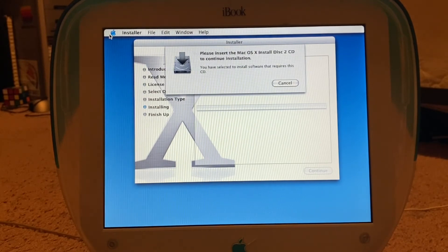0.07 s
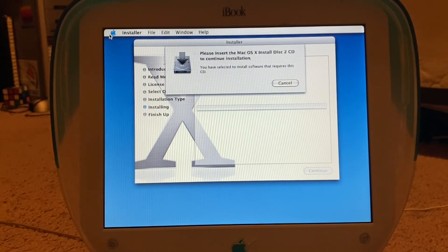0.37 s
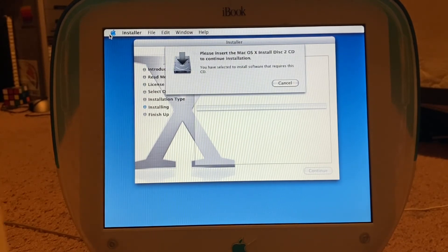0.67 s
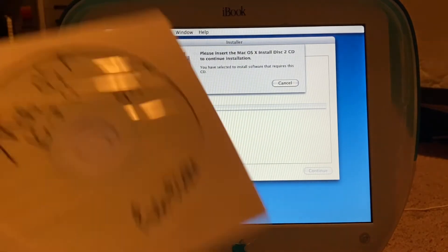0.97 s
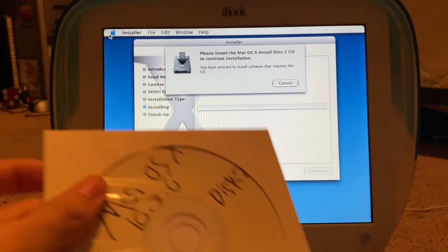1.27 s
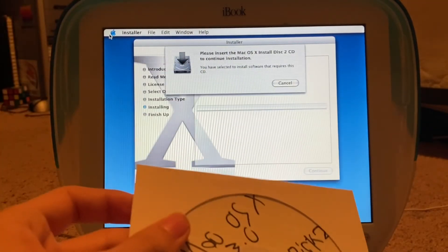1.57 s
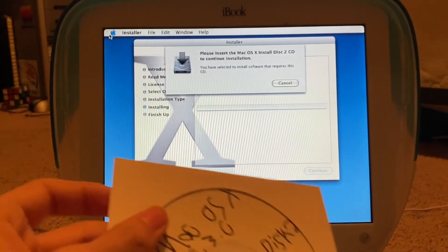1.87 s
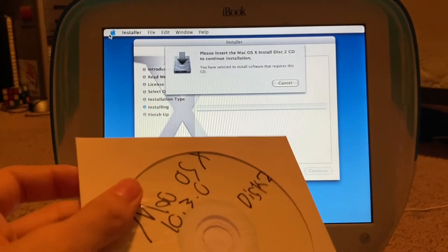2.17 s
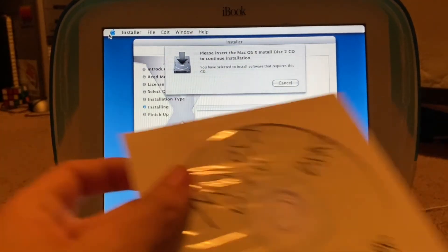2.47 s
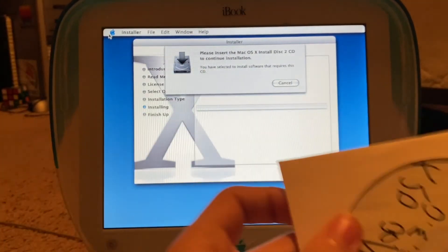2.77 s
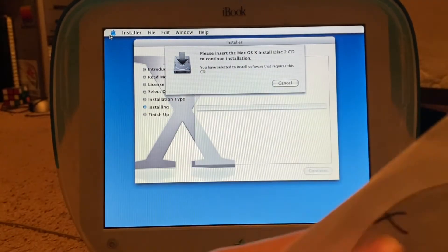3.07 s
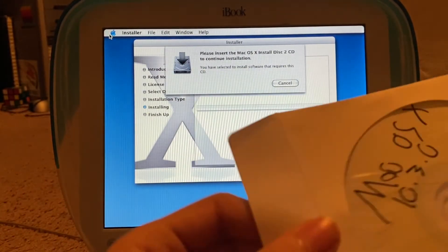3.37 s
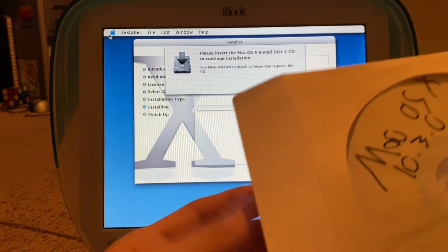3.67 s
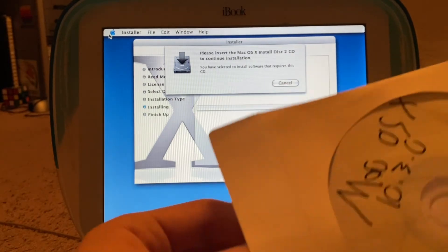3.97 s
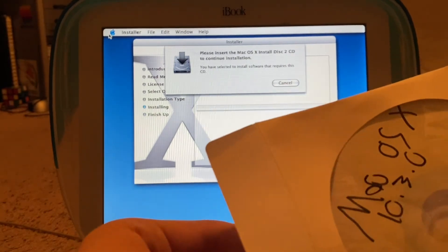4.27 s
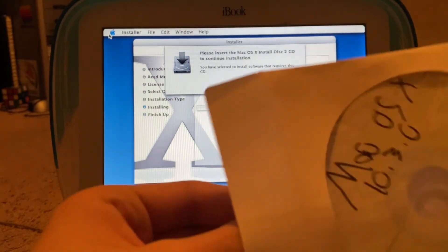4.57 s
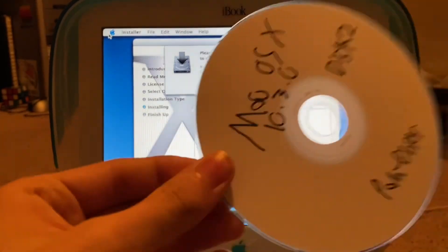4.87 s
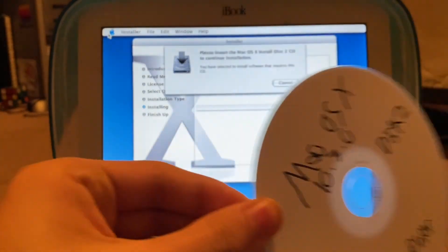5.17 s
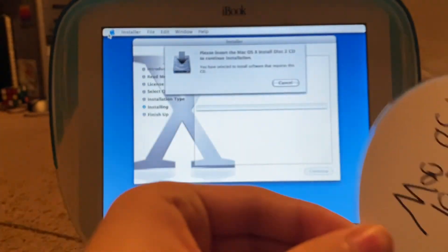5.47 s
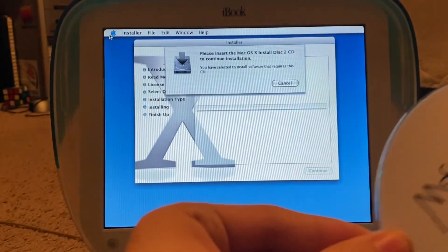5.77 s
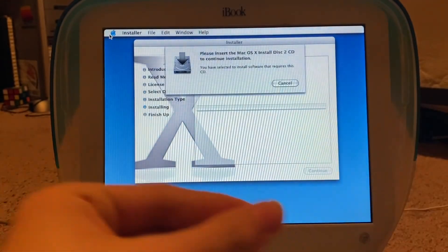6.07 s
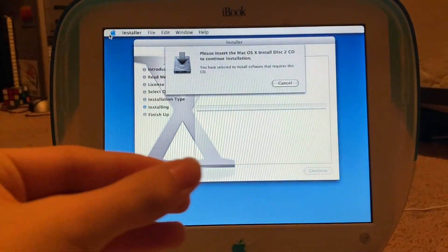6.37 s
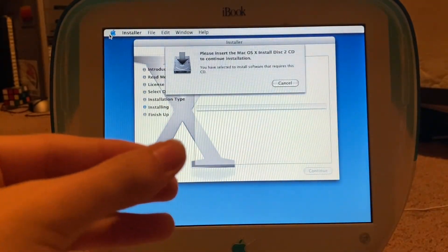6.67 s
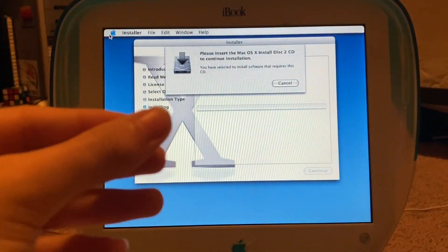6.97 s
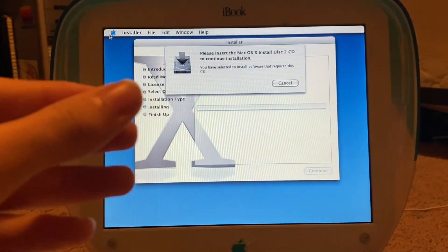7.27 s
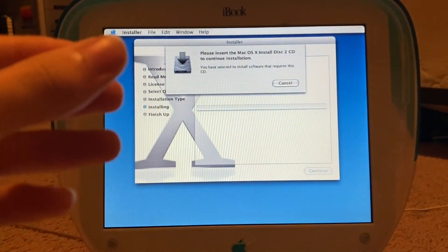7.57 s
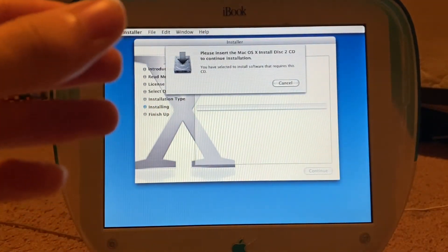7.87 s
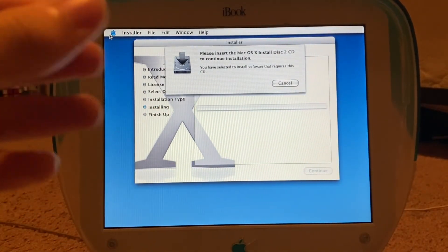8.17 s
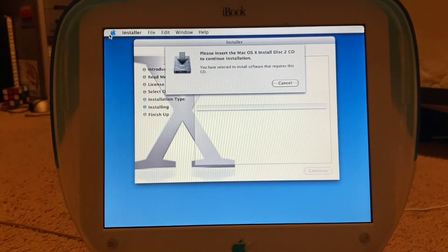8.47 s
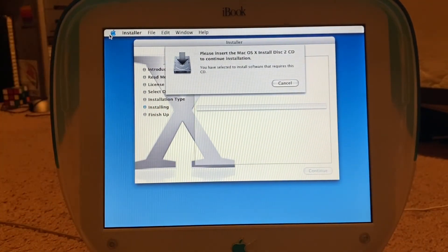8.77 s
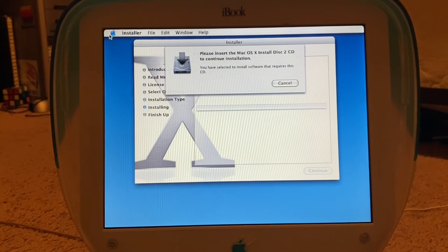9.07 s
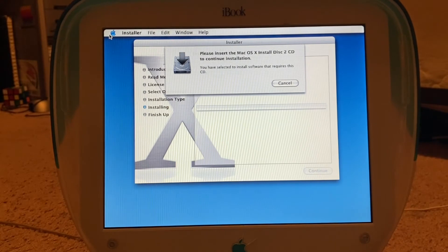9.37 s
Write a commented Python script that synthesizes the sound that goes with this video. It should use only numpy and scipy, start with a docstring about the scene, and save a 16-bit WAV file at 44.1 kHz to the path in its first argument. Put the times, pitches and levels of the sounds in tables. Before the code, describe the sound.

Close paper rustling, a sliding disc and sharp plastic clicks of a laptop tray being loaded and closed, with a steady electrical hum indoors.

```python
"""A low electrical hum fills a small carpeted room throughout. First a paper sleeve crackles close by,
its creases buckling, and a laptop's plastic tray pops open at 1.6 s. The sleeve rustles again until the
disc slides out with a frictional hiss near 4.7 s. The tray is handled and takes the disc on its hub at
6.5 s, each contact exciting the modes of the plastic. It is pushed shut, and from about 9 s the
drive's motor buzzes in harmonics of its step rate."""
import sys
import numpy as np
from scipy import signal
from scipy.fft import rfft, irfft, next_fast_len
from scipy.io import wavfile
from scipy.ndimage import uniform_filter1d, map_coordinates

SR = 44100
rng = np.random.default_rng(int(sys.argv[2]) if len(sys.argv) > 2 else 0)


def master_out(mix):
    """Clip the mix to full scale and print it as 16-bit PCM to the path in sys.argv[1]."""
    frames = np.transpose(np.atleast_2d(mix))
    ceiling = np.clip(frames, -1, 1)
    pcm = np.round(ceiling * 32767).astype(np.int16)
    wavfile.write(sys.argv[1], SR, pcm)


N = 424683
TIME = np.arange(N) / SR

# Levels are relative; brightness raises the treble and lowers the bass by the same amount.
# loudest creases of the sleeve snapping: t/s, level/dB, brightness/dB
CREASES = [(0.194, -70.5, 13.5), (0.354, -51.5, 4.5), (0.4825, -48.5, 8), (0.541, -52.5, 2),
           (0.5967, -69, 12), (0.7212, -66, 14.5), (0.6847, -72, 16), (0.8366, -69, 16), (0.927, -65.5, 4),
           (0.981, -67, 1), (2.49, -66, -1.5), (2.56, -71.5, -10), (2.7238, -41, -5), (2.7784, -54, 10),
           (2.962, -52.5, 10.5), (3.0107, -64.5, 20), (3.1911, -53.5, 13.5), (3.2139, -43, 0),
           (3.3059, -48, 9.5), (3.3567, -50.5, 4.5), (3.3926, -46.5, 4), (3.4047, -39.5, 4.5),
           (3.425, -42.5, 13), (3.4464, -35.5, 3.5), (3.4861, -35.5, -2), (3.583, -48, -3), (3.6, -38, 4.5),
           (3.662, -39, 10), (3.7899, -49.5, -7.5), (3.878, -51.5, 12), (3.9375, -48.5, 2),
           (3.988, -52.5, 10), (4.146, -53, 9.5), (4.178, -51.5, 8.5), (4.2884, -52, -3), (4.415, -45, 4.5)]
# spells of fine crackle as the sleeve bends: start/s, end/s, snap rate/Hz, level/dB
CRACKLE_SPELLS = [(0.34, 0.712, 8, -70), (3.1, 3.98, 20, -56)]
# fingers rubbing the sleeve: t of peak/s, level/dB, brightness/dB, rise/s, fall/s
RUSTLE_STROKES = [(0.4, -59, 9.5, 0.073, 0.21), (0.53, -57.5, -0.5, 0.24, 0.067),
                  (0.83, -66.5, 0, 0.17, 0.29), (1.33, -70, -6, 0.2, 0.18), (2.3, -69.5, -5.5, 0.26, 0.7),
                  (2.76, -64, 10.5, 0.075, 0.27), (2.97, -61, 4.5, .2, 0.22),
                  (3.073, -43.5, -6.5, 0.042, 0.037), (3.15, -50, 2, 0.1, 0.16),
                  (3.245, -37.5, -1.5, 0.022, 0.026), (3.33, -52, 0, 0.1, .05),
                  (3.422, -39, 0, 0.01, 0.033), (3.59, -48, 2.5, .16, 0.064),
                  (3.732, -42.5, 0, 0.084, 0.044), (3.858, -49, 1.5, .07, 0.091),
                  (4.09, -59, 1, 0.094, 0.24), (4.42, -63, 5.5, 0.13, 0.13),
                  (4.57, -44.5, -2.5, 0.02, 0.067), (4.664, -36, -0.5, 0.032, 0.033),
                  (4.806, -33, 0.5, 0.041, 0.014), (4.97, -70, 7, 0.34, .06)]
# treble of the disc sliding along the paper: t/s, level/dB
SLIDE_TREBLE = [(4.45, -64), (4.494, -69), (4.51, -52.5), (4.688, -38.5), (4.708, -29), (4.738, -28.5),
                (4.814, -51), (4.822, -70.5), (4.86, -62.5)]
# sleeve slipping through the fingers: t/s, centre f/Hz, level/dB
SWISH_GLIDE = [(2.5, 3230, -79), (2.68, 3100, -70), (2.78, 2970, -64.5), (2.869, 2794, -57.5),
               (2.951, 2340, -75), (3.039, 2230, -57)]
# spectrum of rubbed paper: f/Hz, level/dB
PAPER_SPECTRUM = [(300, 4.5), (520, -2), (800, -0.5), (1150, 2), (1700, 0.5), (2300, 3.5), (3500, 3),
                  (5000, -3), (7000, -5.5), (11500, -5), (15000, -7.5), (16500, -25.5)]
# knocks on tray and disc: t/s, level/dB, bass re level/dB, treble re level/dB, flexural f/Hz
KNOCKS = [(1.2481, -60.5, -1.5, -28, 784), (1.587, -41, 4, -17, 460), (1.6012, -25, -3, -2, 755),
          (1.6075, -26, -4, -16, 824), (1.727, -52.5, 5.5, -28, 544), (1.8466, -59.5, -3, -27, 850),
          (2.0509, -53, 6.5, -10, 816), (2.726, -57.5, 14.5, 4, 1000), (5.0901, -44, 14, -3, 850),
          (5.1642, -50.5, 10.5, 10, 436), (5.2789, -54.5, 5.5, 0, 1374), (5.7008, -68.5, -2, -4, 455),
          (6.34, -48.5, -1.5, -5.5, 838), (6.3671, -55.5, -1.5, -6, 850), (6.5349, -53, 9.5, -1.5, 1160),
          (6.5605, -34, -1, -5, 850), (6.5715, -44.5, 2.5, -11, 653), (6.597, -48, 4, -4, 865),
          (7.0542, -50.5, 12, -17, 890), (7.072, -52, 1, -5, 696), (7.084, -49, 5, -10, 580),
          (7.2005, -55.5, 4.5, -11, 1130), (7.3482, -77.5, 19.5, -20.5, 843), (7.466, -65.5, 2, -28, 582),
          (7.774, -69.5, 8.5, -18.5, 890), (7.857, -45, -7, 1, 495), (7.8665, -32.5, 9.5, 0, 500),
          (7.872, -27.5, 3, 0.5, 710), (7.886, -39.5, -7, -1, 592), (8.097, -67.5, -14, -2, 472),
          (8.5922, -30.5, -9.5, -4.5, 1110), (8.6044, -32.5, -7, -11, 1000), (8.7061, -29, -2.5, -3, 990),
          (8.8165, -50, -3.5, -4, 910), (8.8584, -36.5, -8, -2.5, 434), (8.8828, -38, -1, -3, 720),
          (8.9501, -56.5, 6, -18, 1710), (9.0256, -56, 5, -10.5, 525)]
# fingers on the tray, tray on its rails: t of peak/s, level/dB, brightness/dB, rise/s, fall/s
SCRAPE_STROKES = [(1.625, -39, -2, .015, 0.067), (1.764, -53, -15, .06, 0.084),
                  (1.927, -49.5, -7, .045, 0.086), (2.08, -63, -12.5, .05, 0.037),
                  (5.105, -46, -4, .012, 0.15), (5.179, -49, 9, .06, 0.021), (5.319, -54, -0.5, .08, 0.035),
                  (5.515, -65.5, -1.5, .03, 0.028), (5.79, -50.5, 0, .04, 0.034),
                  (5.86, -75.5, 4.5, .04, 0.14), (6.76, -71.5, -7, 0.12, 0.1),
                  (6.969, -77.5, -8.5, .1, 0.046), (7.084, -56, -8, 0.14, 0.1),
                  (7.48, -70, -10, .05, 0.093), (7.909, -49, -2.5, .02, 0.09),
                  (8.45, -55, -2.5, 0.067, 0.17), (8.579, -46.5, -2, .09, 0.28),
                  (8.66, -50.5, -4, .08, 0.11), (8.9, -55, -9.5, .07, 0.083),
                  (9.05, -65.5, -11, .06, 0.085)]
# disc skidding over the hub: t of peak/s, level/dB, brightness/dB, rise/s, fall/s
SKID_STROKES = [(6.38, -61.5, -8, 0.016, 0.15), (6.52, -45, 1, 0.084, .04),
                (6.548, -43.5, -12, .015, 0.065), (6.61, -48.5, -13, 0.047, 0.042)]
# disc brushing round as it starts to spin: t/s, level/dB
SPIN_LEVEL = [(9.26, -100), (9.32, -61), (9.45, -69), (9.63, -82)]
# modes of the tray: f/Hz, bandwidth/Hz, gain/dB
TRAY_MODES = [(325, 60, -4.5), (505, 21, -1.5), (846, 50, -1), (1110, 15, -11), (1807, 55, 6),
              (2230, 60, -2), (2850, 460, 2.5), (3070, 64, -6), (3420, 80, 3), (3690, 70, 6),
              (4120, 450, -6), (4650, 54, 0), (5360, 44, -14), (6980, 210, -8.5), (7300, 80, -5)]
# modes of the bare disc: f/Hz, bandwidth/Hz, gain/dB
DISC_MODES = [(830, 55, -9), (1260, 41, -9), (1750, 130, -14), (2800, 120, -2.5), (3110, 70, -0.5),
              (3420, 56, -11.5), (3760, 120, 1), (4400, 43, -5.5), (4940, 69, -10.5), (5480, 49, -11),
              (6500, 75, -10.5), (7000, 43, -13.5)]
# soft bumps of the hand: t/s, level/dB, f/Hz, duration/s
BUMPS = [(2.39, -37, 78.7, .1), (2.41, -38, 117, 0.06), (2.724, -26.5, 74, 0.03), (3.85, -39, 50.7, 0.081),
         (5.088, -36, 175, 0.048), (5.15, -42, 185, 0.058), (7.864, -33.5, 216, 0.02),
         (7.87, -35.5, 84.7, 0.048)]
# strongest harmonics of the motor's step rate: harmonic number, level/dB
MOTOR_HARMONICS = [(5, -79), (6, -78), (9, -81), (11, -75.5), (13, -81), (15, -82), (17, -73.5), (18, -76),
                   (19, -80), (23, -82), (24, -85)]
# envelope of the drive's whirr: t/s, level/dB
WHIRR_LEVEL = [(0, -82), (1.2, -72.5), (2.4, -76.5), (4.3, -82), (5.5, -98.5), (6.3, -115), (7.0, -81.5),
               (8.3, -87), (8.85, -82), (9.0, -77.5), (9.63, -63)]
# spectrum of the whirr: f/Hz, level/dB
WHIRR_SPECTRUM = [(200, -11.5), (560, 2), (900, -4.5), (1650, -6), (2600, -8.5), (3800, -11), (5500, -32),
                  (9000, -27.5), (16000, -39.5)]
# tones of the electrical hum: f/Hz, level/dB, modulation depth
HUM_TONES = [(84.6, -54, 0.1), (120.1, -51.5, 0.1), (148.8, -52, 0.1), (239.5, -62.5, .25),
             (269, -60.5, .2)]
# spectrum of the room's rumble: f/Hz, level/dB
RUMBLE_SPECTRUM = [(20, -17), (35, -5.5), (55, 4.5), (85, 1), (105, -4), (170, -4.5), (270, -11),
                   (340, -19), (500, -27), (1000, -40.5), (2500, -47), (7000, -56.5), (15500, -55),
                   (17000, -67.5)]
# phase lag of the left microphone: f/Hz, lag/cycles
LEFT_LAG = [(0, 0), (7400, 0), (9200, .5), (11150, 1), (13400, 1.5), (15200, 2)]
# bass, middle and treble bands: lower f/Hz, upper f/Hz
BANDS = [(245, 1300), (1300, 5500), (5500, 16000)]


def creases(rise_s=.0005, snap_t60=.006, flutter_db=-24, flutter_t60=.05, facet_hz=4000, facet_db=6):
    """Buckling: a crease snaps, coloured by its facet's resonance; the sheet flutters briefly after."""
    times, db, bright_db = np.transpose(list(CREASES) + crackle())
    age = np.arange(3000) / SR
    decay = from_db(-60 * age / snap_t60) + from_db(flutter_db - 60 * age / flutter_t60)
    snaps = rng.standard_normal((len(times), len(age))) * np.minimum(age / rise_s, 1) * decay
    notes = facet_hz * 2 ** rng.uniform(-1.8, 1.8, len(times))  # facets differ in size
    facets = np.array([resonance(snap, hz, hz / 5) for snap, hz in zip(snaps, notes)])
    return place(times, snaps + from_db(facet_db) * facets, tilted(db, bright_db, edges_db=-0.9))


def crackle(spread_db=3, bright_db=7, bright_spread_db=3):
    """Random buckling: small creases give way irregularly; rows of t/s, level/dB, brightness/dB."""
    rows = []
    for start, end, per_s, db in CRACKLE_SPELLS:
        times = start + np.cumsum(rng.uniform(.2, 1.8, 64)) / per_s
        size, colour = rng.standard_normal((2, 64))
        snaps = np.transpose([times, db + spread_db * size, bright_db + bright_spread_db * colour])
        rows += list(snaps[times < end])
    return rows


def rustle():
    """Stick-slip friction: fingers catch on the paper in grainy strokes."""
    rub = friction(per_s=900, spread_db=5, smooth_db=-3, grip_db=1.6, grip_hz=160)
    return strokes(coloured(rub, PAPER_SPECTRUM), RUSTLE_STROKES, edges_db=-1.5)


def slide(reference_db=-42, low_db=-53, mid_db=-47, high_db=-39):
    """Sliding friction: as the disc speeds out of the paper, its treble grows faster than its bass."""
    rub = friction(per_s=5000, spread_db=3, smooth_db=0, grip_db=1, grip_hz=140)
    bands = in_bands(coloured(rub, PAPER_SPECTRUM))
    times, db = np.transpose(SLIDE_TREBLE)
    push_db = np.interp(TIME, times, db) - reference_db
    levels = [low_db + .27 * push_db, mid_db + .64 * push_db, high_db + push_db]
    hiss = sum(band * from_db(level) for band, level in zip(bands, levels))
    return gate(times, ramp_samples=600) * hiss


def swish(width_hz=220):
    """Narrow-band friction noise: its pitch sinks as the sleeve slips through the fingers."""
    times, hz, db = np.transpose(SWISH_GLIDE)
    lowpass = signal.butter(2, width_hz, fs=SR, output="sos")
    slow = rms_one(signal.sosfilt(lowpass, rng.standard_normal((2, N))))
    phase = 2 * np.pi * np.cumsum(np.interp(TIME, times, hz)) / SR
    band = slow[0] * np.cos(phase) + slow[1] * np.sin(phase)
    return gate(times, ramp_samples=2000) * from_db(np.interp(TIME, times, db)) * band


def knocks(rise_s=.0012, contact_t60=.016, flex_db=9, flex_width_hz=150, loose_db=-25, loose_t60=.15):
    """Impact excitation: the plastic flexes at a note set by the spot struck; loose parts rattle on."""
    times, db, bass_db, treble_db, notes = np.transpose(KNOCKS)
    age = np.arange(6000) / SR
    decay = from_db(-60 * age / contact_t60) + from_db(loose_db - 60 * age / loose_t60)
    forces = rng.standard_normal((len(times), len(age))) * decay * np.minimum(age / rise_s, 1)
    flex = np.array([resonance(force, hz, flex_width_hz) for force, hz in zip(forces, notes)])
    ringing = plastic(forces, TRAY_MODES, direct_db=-1, cutoff_hz=8100, spot_db=4.5)
    return place(times, ringing + from_db(flex_db) * flex, [db + bass_db, db, db + treble_db])


def scrapes(tray_db=-3, disc_db=-1):
    """Forced vibration: rubbing drives the modes of tray and disc; the spinning disc brushes faintly."""
    rub = friction(per_s=1500, spread_db=3.5, smooth_db=-1, grip_db=1.6, grip_hz=120)
    tray = plastic(rub, TRAY_MODES, direct_db=3, cutoff_hz=6000)
    disc = plastic(rub, DISC_MODES, direct_db=-17, cutoff_hz=8000)
    scrape = from_db(tray_db) * strokes(tray, SCRAPE_STROKES, edges_db=-3)
    skid = from_db(disc_db) * strokes(disc, SKID_STROKES, edges_db=-9)
    spin = envelope(SPIN_LEVEL) * rms_one(tray) * (TIME > SPIN_LEVEL[0][0])
    return scrape + skid + spin


def friction(per_s, spread_db, smooth_db, grip_db, grip_hz):
    """Stick-slip motion: tiny uneven slips lie over a smooth hiss while the grip tightens and loosens."""
    sizes = from_db(spread_db * np.minimum(rng.exponential(1, N), 4)) * rng.choice([-1, 1], N)
    slips = rms_one(sizes * (rng.random(N) < per_s / SR))
    return (slips + from_db(smooth_db) * rng.standard_normal(N)) * from_db(grip_db * drift(grip_hz))


def strokes(sound, rows, edges_db, fade_db=18, roundness=1.16):
    """Incoherent addition: strokes swell and fade by fade_db over rise and fall, and add in power."""
    power = np.zeros((3, N))
    for peak_s, db, bright_db, rise_s, fall_s in rows:
        near = slice(*np.searchsorted(TIME, [peak_s - 2 * rise_s, peak_s + 2 * fall_s]))
        offset = TIME[near] - peak_s
        away = np.maximum(-offset / rise_s, offset / fall_s) ** roundness
        power[:, near] += from_db(tilted(db - fade_db * away, bright_db, edges_db)) ** 2
    return np.sum(np.sqrt(power) * in_bands(sound), axis=0)


def plastic(force, modes, direct_db, cutoff_hz, spot_db=0):
    """Modal superposition: modes ring beside the direct contact, weighted by the spot struck."""
    spots = spot_db * rng.standard_normal(force.shape[:-1] + (len(modes), 1))
    ringing = sum(from_db(db + spots[..., k, :]) * resonance(force, hz, width)
                  for k, (hz, width, db) in enumerate(modes))
    lowpass = signal.butter(1, cutoff_hz, fs=SR, output="sos")
    return signal.sosfilt(lowpass, ringing + from_db(direct_db) * force)


def bumps():
    """Soft impact: a hand pushes the case through a few slow cycles."""
    out = np.zeros(N)
    for start, db, hz, length in BUMPS:
        during = (TIME > start) & (TIME < start + length)
        age = TIME[during] - start
        out[during] += from_db(db) * np.sin(np.pi * age / length) * np.sin(2 * np.pi * hz * age)
    return out


def drive(start_s=8.94, rise_s=.03, step_hz=100, buzz_db=-.5, steps_db=-76, wobble=.3):
    """Periodic excitation: over a soft whirr, the motor starts stepping steadily under an uneven load."""
    whirr = envelope(WHIRR_LEVEL) * coloured(rng.standard_normal(N), WHIRR_SPECTRUM)
    cycles = step_hz * TIME + rng.random()
    on = TIME > start_s
    buzz = np.zeros(N)
    for k, db in MOTOR_HARMONICS:
        load = 1 + wobble * map_coordinates(rng.standard_normal(500), [TIME[on] * 40], order=1)
        buzz[on] += from_db(db) * load * np.sqrt(2) * np.sin(2 * np.pi * (k * cycles[on] + rng.random()))
    steps = coloured(np.diff(np.floor(cycles), prepend=0), WHIRR_SPECTRUM)  # one pulse a cycle
    onset = np.clip((TIME - start_s) / rise_s, 0, 1)
    return whirr + onset * (from_db(buzz_db) * buzz + from_db(steps_db) * steps)


def hum(apart_rad=0.31):
    """Standing waves: wavering electrical tones reach the two microphones slightly out of phase."""
    tones = 0
    for hz, db, depth in HUM_TONES:
        phase = 2 * np.pi * (hz * TIME + rng.random()) + apart_rad * np.array([[.5], [-.5]])
        in_phase = (1 + depth * drift(6.5)) * np.cos(phase)
        quadrature = depth * drift(7) * np.sin(phase)
        tones += from_db(db) * np.sqrt(2) * (in_phase + quadrature)
    return panned(tones, pan_db=-2.1)


def rumble(level_db=-52, side_db=-14):
    """Partial coherence: the room's low noise is nearly the same on both sides."""
    mid, side = coloured(rng.standard_normal((2, N)), RUMBLE_SPECTRUM)
    return from_db(level_db) * (mid + from_db(side_db) * side * [[1], [-1]])


def screen_echo(x, echo_db, lag_s, sway):
    """Comb filtering: the screen's reflection interferes, along a path that changes as the hands move."""
    delay = lag_s * np.exp(sway * drift(7))
    return x + from_db(echo_db) * np.interp(TIME - delay, TIME, x)


def off_centre(x, side_db, centre_hz, width_hz, lag_s):
    """Interference: for a source to one side, the low mids lean right and the upper mids left."""
    side = resonance(np.interp(TIME - lag_s, TIME, x), centre_hz, width_hz)
    return x + from_db(side_db) * side * [[-1], [1]]


def room(x, early_db, early_t60, late_db, side_db, late_t60=.14, side_hz=6000, wall_hz=9000):
    """Reverberation: quick reflections from screen and floor, then a faint tail, wider in the lows."""
    age = np.arange(SR // 2) / SR
    early = from_db(early_db) * rms_one(from_db(-60 * age / early_t60) * (age > .002))
    late = from_db(late_db) * rms_one(from_db(-60 * age / late_t60) * (age > .008))
    mid, side = rng.standard_normal((2, len(age))) * (early + late) / np.sqrt(len(age))
    side = from_db(side_db) * signal.lfilter(*signal.butter(1, side_hz, fs=SR), side)
    echoes = signal.lfilter(*signal.butter(1, wall_hz, fs=SR), [mid + side, mid - side])
    return x + signal.fftconvolve(x, echoes, axes=1)[:, :N]


def place(times, sounds, levels):
    """Superposition: short sounds add, each band with the energy of 10 ms at its given level."""
    size = sounds.shape[1]
    sounds = sum(band * from_db(db)[:, None] for band, db in zip(in_bands(sounds), levels))
    out = np.zeros(N + size)
    for t, sound in zip(times, sounds):
        start = int(t * SR)
        out[start:start + size] += sound
    return out[:N] * np.sqrt(.01 * SR / size)


def resonance(x, hz, width_hz):
    """Damped oscillator: two poles, with unit gain at the peak."""
    r = np.exp(-np.pi * width_hz / SR)
    feedback = [1, -2 * r * np.cos(2 * np.pi * hz / SR), r * r]
    return signal.lfilter(np.array([1, 0, -1]) * (1 - r * r) / 2, feedback, x)


def coloured(x, spectrum):
    """Spectral shaping of a steady sound, to unit rms."""
    hz, db = np.transpose(spectrum)
    size = next_fast_len(N)
    bins = np.arange(size // 2 + 1) * SR / size
    gain = from_db(np.interp(np.log(bins + 1), np.log(hz), db))
    return rms_one(irfft(rfft(x, size) * gain, size)[..., :N])


def in_bands(x):
    """Band-pass filtering into bass, middle and treble, each of unit rms."""
    return [rms_one(signal.sosfilt(signal.butter(3, band, "band", fs=SR, output="sos"), x))
            for band in BANDS]


def tilted(db, bright_db, edges_db):
    """Spectral tilt: three band levels, trading bass for treble; edges_db shifts both outer bands."""
    return [db - bright_db + edges_db, db, db + bright_db + edges_db]


def envelope(rows):
    """Amplitude envelope, linear in decibels between points."""
    return from_db(np.interp(TIME, *np.transpose(rows)))


def gate(times, ramp_samples):
    """Time window from the first to the last of the times, with linear ramps."""
    return uniform_filter1d(((TIME > times[0]) & (TIME < times[-1])).astype(float), size=ramp_samples)


def drift(rate_hz):
    """Random modulation with a standard deviation of about one."""
    knots = rng.standard_normal(int(N / SR * 1000))
    return map_coordinates(knots, [TIME * rate_hz], order=1) * np.sqrt(1.5)


def panned(x, pan_db):
    """Intensity panning: the left exceeds the right by pan_db."""
    return x * from_db(np.array([[.5], [-.5]]) * pan_db)


def rms_one(x):
    """Normalisation to unit rms."""
    return x / np.sqrt(np.mean(x ** 2, axis=-1, keepdims=True) + 1e-20)


def from_db(db):
    """Amplitude ratio of a level."""
    return 10 ** (np.asarray(db) / 20)


def scene():
    """Linear superposition: sleeve and laptop, with their reflections, over the hum and rumble."""
    sleeve = creases() + rustle() + slide() + swish()
    sleeve = from_db(-1) * screen_echo(sleeve, echo_db=-7.5, lag_s=.0018, sway=.12)
    paper = room(panned(sleeve, pan_db=.75), early_db=-15, early_t60=.03, late_db=-21.5, side_db=4)
    rubbed = from_db(-2.5) * screen_echo(scrapes(), echo_db=-6, lag_s=.0013, sway=.15)
    tray = off_centre(knocks() + rubbed, side_db=-5.5, centre_hz=700, width_hz=1300, lag_s=.00015)
    laptop = room(tray, early_db=-12.5, early_t60=.046, late_db=-16, side_db=0)
    return paper + laptop + bumps() + drive() + hum() + rumble()


def record(dry, cutoff_hz=16500):
    """Phase shift and band limiting: the left microphone lags in the treble, and the top is cut."""
    size = next_fast_len(N + 2000)
    lag = np.interp(np.arange(size // 2 + 1) * SR / size, *np.transpose(LEFT_LAG))
    left = irfft(rfft(dry[0], size) * np.exp(-2j * np.pi * lag), size)[:N]
    return signal.sosfilt(signal.ellip(10, .1, 80, cutoff_hz, fs=SR, output="sos"), [left, dry[1]])


dry = scene()
out = record(dry)
master_out(out)
```